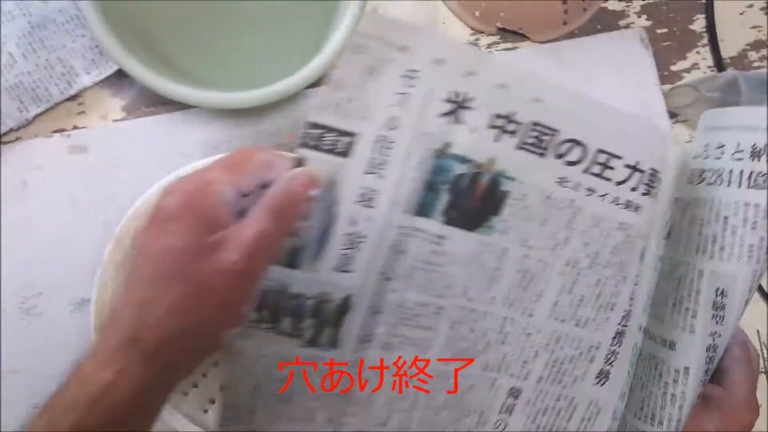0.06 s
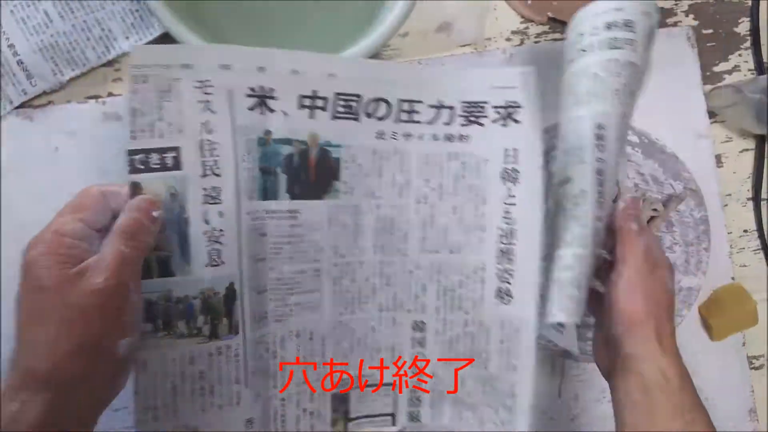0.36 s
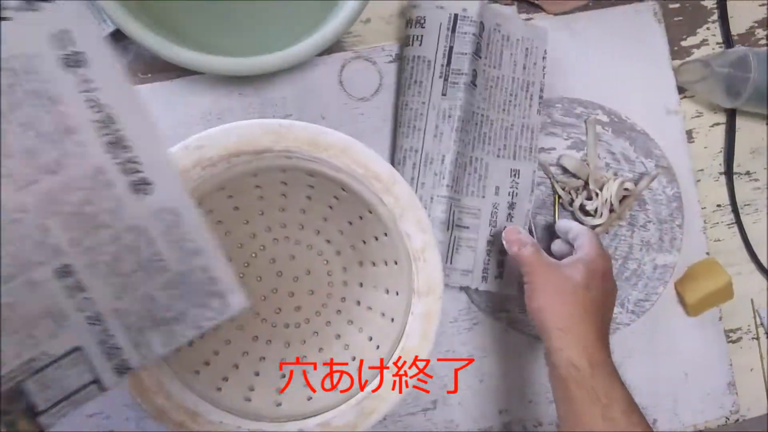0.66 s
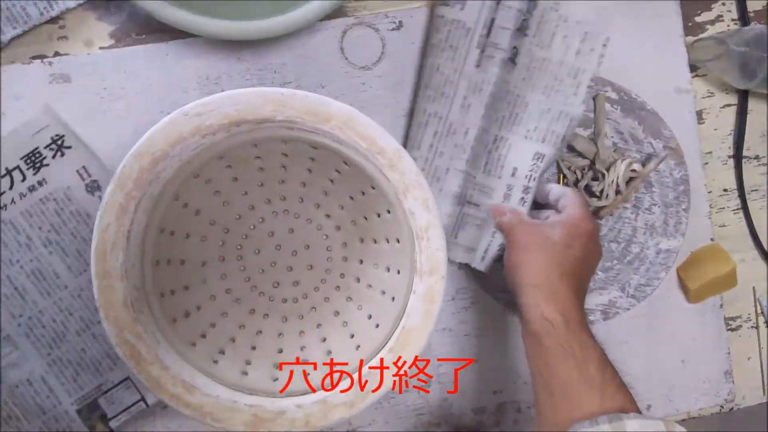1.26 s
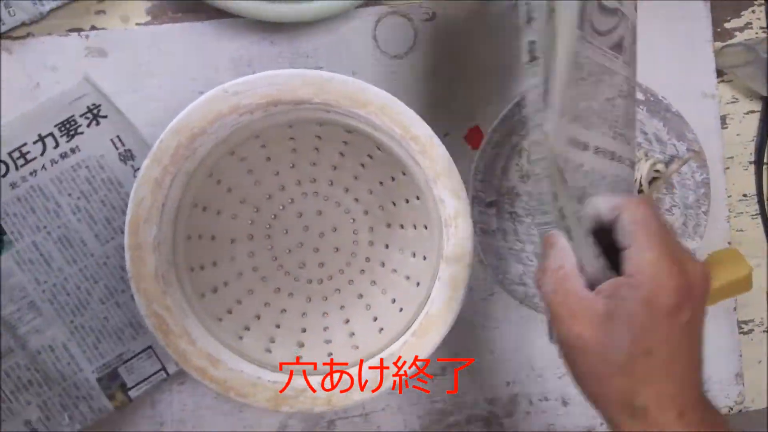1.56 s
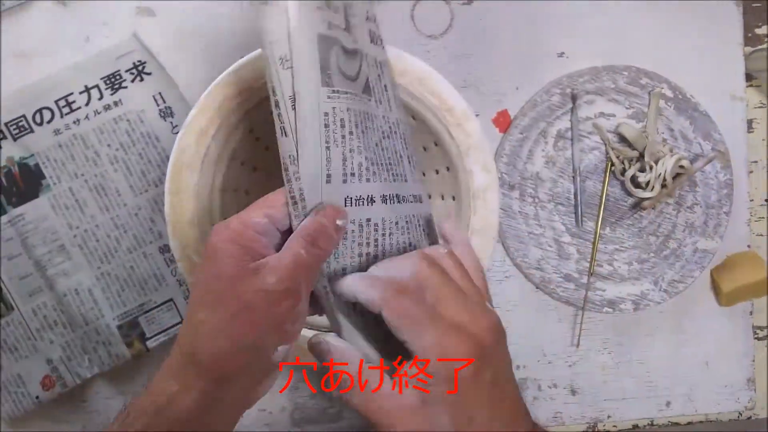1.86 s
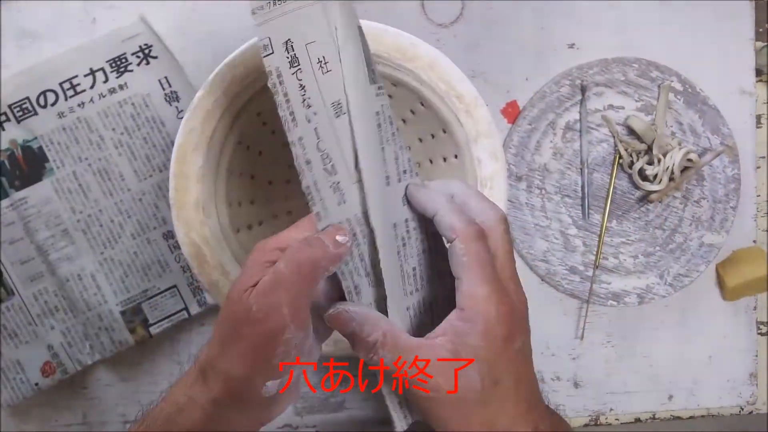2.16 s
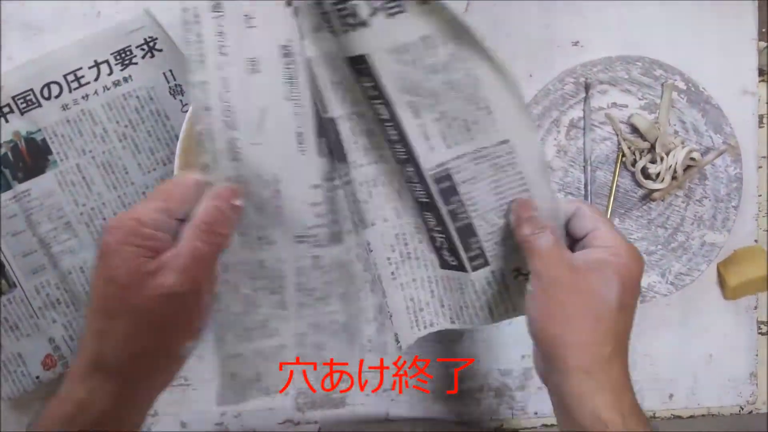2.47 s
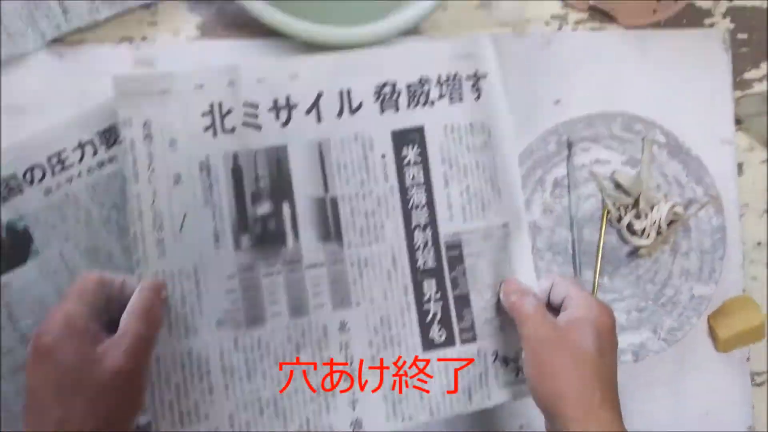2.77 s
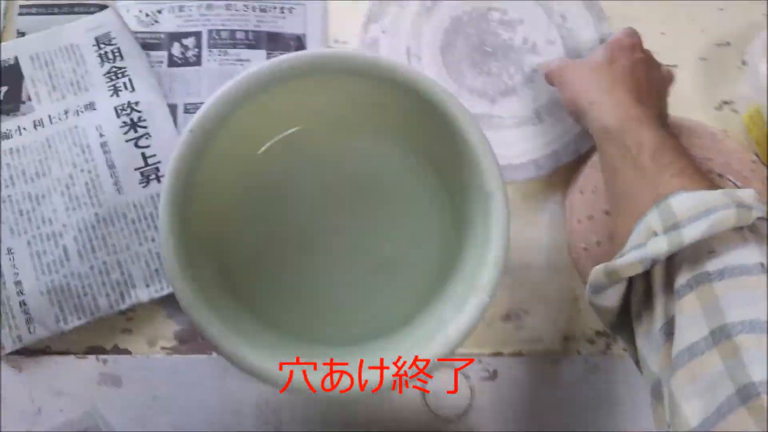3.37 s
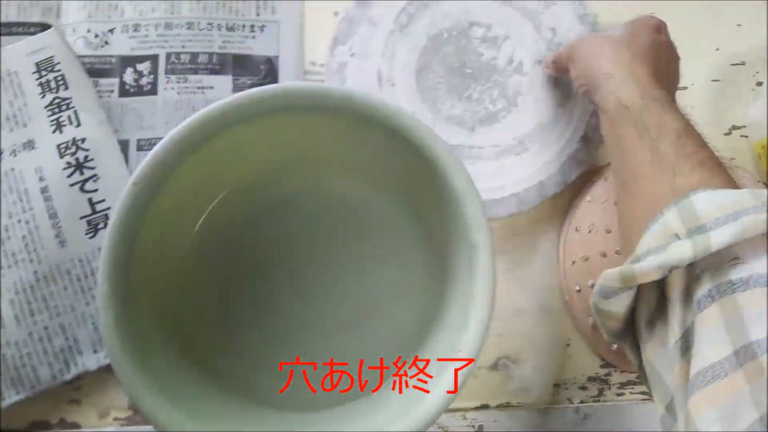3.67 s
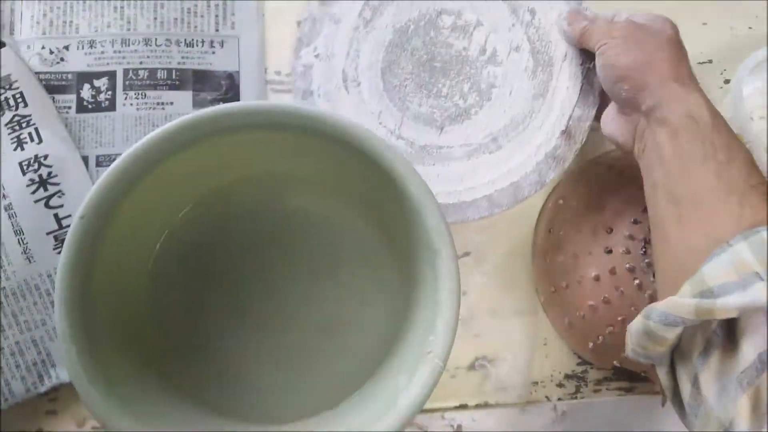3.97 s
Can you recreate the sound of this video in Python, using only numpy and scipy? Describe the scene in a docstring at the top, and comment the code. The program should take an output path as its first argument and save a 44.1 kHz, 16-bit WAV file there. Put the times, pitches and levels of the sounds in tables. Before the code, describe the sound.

Sheets of newspaper being unfolded and laid down, then some soft tabletop knocks and thumps.

```python
"""At a worktable in a small room, sheets of newspaper are pulled apart, unfolded and laid down up close. Paper
slides on paper in a dense fizz of tiny slips, creases buckle with sharp snaps, and loose sheets flap. Near the
end come a few dull pops, soft thumps of the tabletop and two tiny ticks. A faint mains hum and quiet room air
lie underneath."""
import sys
import numpy as np
from scipy import signal
from scipy.fft import rfft, irfft
from scipy.io import wavfile
from scipy.ndimage import map_coordinates

SR = 44100
rng = np.random.default_rng(int(sys.argv[2]) if len(sys.argv) > 2 else 0)


def file_out(sig):
    """Save sig as 16-bit WAV at sys.argv[1]."""
    # one column per channel
    cols = np.atleast_2d(sig).T
    # limit, then scale
    lim = np.clip(cols, -1, 1)
    pcm = np.round(lim * 32767).astype(np.int16)
    wavfile.write(sys.argv[1], SR, pcm)


N = 176400  # 4 seconds

# Each slide of a sheet. It fades by 20 dB in release_s; body and treble are compared with the middle.
# start_s, attack_s, hold_s, release_s, level_db, body_db, treble_db
SLIDES = [ (0.0, 0.0013, 0.05, 0.15, -42.5, -1, 6), (0.141, 0.0042, 0.034, 0.2, -45, 0.5, 4.5),
          (.22, .03, .03, .12, -50, 0, 5.5), (0.296, 0.004, 0.035, 0.22, -43, 1.5, 4),
          (.386, .004, .02, .1, -45, 3, -3), (.46, .02, .02, .1, -52, 6, -3),
          (0.519, 0.034, 0.02, 0.2, -40, 2.5, 1.5), (0.622, 0.044, 0.057, 0.11, -36.5, -6.5, -9.5),
          (0.749, 0.014, 0.021, 0.4, -51, 5, -1), (.955, .003, .008, .09, -51, -1, 4),
          (1.012, 0.004, 0.008, 0.13, -47.5, 0, 3), (1.1, .01, .01, .1, -54, 4, 2),
          (1.117, 0.01, 0.017, .16, -38.5, -2, 3.5), (1.18, 0.0211, 0.087, 0.33, -42, -4.5, 3),
          (1.399, 0.02, .04, 0.1529, -42.5, -2.5, 3.5), (1.467, 0.0043, 0.024, .15, -38.5, -1, 2),
          (1.557, .02, 0.039, 0.1983, -48, 1.5, 6), (1.684, 0.0085, 0.022, 0.16, -42, -5, 2.5),
          (1.8, 0.013, 0.04, .4, -50, -1, 2), (1.901, .009, 0.024, 0.055, -30, -3.5, -2.5),
          (1.94, 0.02, 0.035, 0.18, -36.5, -2, 1.5), (2.044, 0.0069, 0.042, .18, -41.5, 1, 4.5),
          (2.129, .005, 0.011, 0.3, -40.5, -7, 2), (2.258, 0.016, 0.073, 0.3, -39.5, -3.5, -1),
          (2.396, .006, 0.006, 0.08, -33.5, -8, -4.5), (2.428, 0.022, 0.032, 0.2, -38, -4, 0.5),
          (2.538, 0.014, 0.018, 0.13, -36.5, -1.5, -1), (2.624, 0.036, .02, 0.15, -37.5, -3, -1),
          (2.687, .004, 0.018, 0.0728, -33, -1, -3), (2.731, 0.026, 0.024, 0.09, -34, 0, 0.5),
          (2.822, 0.013, 0.022, 0.13, -40, 5, -3.5), (2.888, .004, .015, .09, -45, 6, -3),
          (3.206, 0.053, 0.044, 0.5, -65.5, 7.5, -6), (3.33, .02, .03, .1, -63, 0, 0),
          (3.383, 0.0063, 0.017, 0.135, -42, 9.5, -8), (3.502, 0.015, 0.023, 0.25, -61.5, 5, 9.5),
          (3.6, .01, 0.055, 0.35, -59.5, -10, 4), (3.69, .03, 0.035, 0.02, -55.5, 0, 1),
          (3.821, 0.021, 0.03, 0.2, -53.5, -1, 0), (3.94, .02, .03, .2, -59, -1, 0)]
def sliding(slips_per_s=1400, slip_spread_db=3.1, flutter_per_s=120, flutter_db=0.88, gain_db=-0.8):
    """Paper rubs on paper: tiny uneven slips over a fine fizz. Gives body, middle and treble layers."""
    t, power = np.arange(SR // 2) / SR, np.zeros((3, N))
    for start, attack, hold, release, db, body_db, treble_db in SLIDES:
        fade_db = 20 * np.maximum(t - attack - hold, 0) / release
        envelope = np.minimum(t / attack, 1) * undb(db - fade_db)
        add(power, (undb([[body_db], [0], [treble_db]]) * envelope) ** 2, start)
    sizes = undb(slip_spread_db * np.minimum(rng.exponential(size=N), 4))
    slips = (rng.random(N) < slips_per_s / SR) * sizes * rng.choice([-1, 1], (2, N))
    smear = rng.standard_normal((2, 256)) * np.exp(-t[:256] / 0.00086)  # the sheet blurs each slip
    slips = shape(slips, np.exp(1j * np.angle(rfft(smear, N))))
    fizz = rng.standard_normal((2, N))
    rubbing = unit(unit(slips) + fizz)
    wobble = np.interp(np.arange(N) / SR * flutter_per_s, np.arange(4096), rng.standard_normal(4096))
    return np.sqrt(power)[:, None] * rubbing * undb(gain_db + flutter_db * wobble)


# Each crease that gives way: start_s, level_db, body_db, treble_db, pitch_hz
CREASES = [ (0.144, -39, -1, -5, 3300), (.302, -41, -2, 0, 2300), (.389, -33.5, 0, -20, 2100),
           (0.5138, -37, 2.5, -14.5, 3900), (0.678, -31, -5, -25, 3300), (0.7148, -31, -15, -8, 3800),
           (.9555, -43, -1, 3, 3300), (.962, -44.5, -10, 7, 3500), (1.015, -41, -3, 5.5, 3500),
           (1.218, -39, -5, 0, 2700), (1.2632, -42, -9, -3, 3300), (1.3223, -30.5, -0.5, -3, 3600),
           (1.333, -35.5, 2, 0, 2700), (1.383, -41, -3, -12, 3000), (1.4685, -30, -9, -8, 3200),
           (1.5741, -37.5, -15, -10, 3700), (1.637, -41, 2, -9, 3400), (1.7596, -39.5, -12, -12, 2800),
           (1.8326, -41, -10, -4, 5700), (1.9107, -27.5, -6, -12, 2700), (1.9905, -33, -0.5, 6.5, 4000),
           (2.053, -36, 2, -4, 2400), (2.0653, -30, 2, 7.5, 4600), (2.095, -36, -4, 5, 3400),
           (2.1322, -30, -7, 7.5, 4300), (2.1364, -30, -2.5, 8.5, 4400), (2.236, -37, -1.5, 3.5, 4800),
           (2.262, -39, -4, 4, 3600), (2.2888, -31.5, -5.5, 5, 3600), (2.311, -31.5, -3, -1, 3800),
           (2.3395, -34, -2.5, -3, 3700), (2.388, -31, -20, -4, 3400), (2.4025, -28.5, -12, -4, 3500),
           (2.479, -37, -11, 8, 3700), (2.553, -36, 0, -3, 4800), (2.6683, -34, -6, -10, 3300),
           (2.6903, -27.5, -7, -5, 3600), (2.7425, -28.5, -11, -5, 3400), (2.7628, -31, -3, 4.5, 3600),
           (2.802, -33, 1.5, -7, 3700), (2.8882, -38, 0, 0, 1300)]
def buckling(snap_s=0.0013, shiver_s=0.0072, shiver_db=-2.5, ring_db=3.5, width_hz=1100, gain_db=-2.5):
    """A crease snaps at its own pitch and the sheet shivers. Gives body, middle and treble layers."""
    t, out = np.arange(2048) / SR, np.zeros((3, 2, N))
    envelope = np.exp(-t / snap_s) + undb(shiver_db) * np.exp(-t / shiver_s)
    for start, db, body_db, treble_db, hz in CREASES:
        snap = rng.standard_normal((2, len(t))) * envelope
        snap /= np.sqrt(np.sum(snap ** 2, axis=1, keepdims=True) / (SR // 200))  # even out the energy
        ring = signal.lfilter(*signal.iirpeak(hz, hz / width_hz, fs=SR), snap)
        snap += (undb(ring_db) - 1) * ring
        layer_gains = undb(db + gain_db + np.array([body_db, 0, treble_db]))
        add(out, layer_gains[:, None, None] * snap, start)
    return out * pan(-1)


# Each ringing sheet or pocket of air: centre_s, half_length_s, pitch_hz, width_hz, level_db
SHEET_FLAPS = [(0.164, .03, 1110, 300, -52), (0.318, 0.022, 1720, 200, -53), (.375, .04, 1050, 500, -52),
               (.345, 0.04, 190, 200, -55), (.515, .007, 830, 200, -46), (0.588, 0.028, 580, 130, -46.5),
               (0.579, 0.053, 990, 300, -52.5), (0.676, 0.022, 3100, 800, -43),
               (1.024, 0.012, 536, 110, -52), (1.134, 0.018, 165, 120, -50),
               (1.925, 0.019, 1400, 900, -35.5), (2.785, 0.07, 530, 110, -45), (2.838, 0.012, 350, 80, -43),
               (2.902, 0.04, 560, 200, -53.5), (2.703, .025, 3500, 1000, -36),
               (3.419, 0.037, 220, 250, -51), (3.5, .05, 400, 500, -55), (3.77, 0.043, 600, 700, -59),
               (3.871, 0.052, 960, 300, -61.5)]
def flapping():
    """Loose sheets flap and the hollows between them ring for a moment."""
    t, out = np.arange(-6000, 6000) / SR, np.zeros((2, N))
    for centre, half_length, hz, width, db in SHEET_FLAPS:
        swell = undb(db) * np.exp(-(t / half_length) ** 2)
        add(out, swell * ringing(hz, width, len(t)), centre + t[0])
    return out


def bending(sound, depth_db=1.83, width_hz=328.4, hold_s=0.05):
    """As the sheet bends, random pitches in its sound grow stronger and weaker."""
    hz, t, spectrum = signal.stft(sound, SR, nperseg=512)
    random_grid = rng.standard_normal((256, 512))
    positions = np.meshgrid(hz / width_hz, t / hold_s, indexing="ij")
    swell = map_coordinates(random_grid, positions, order=1, mode="mirror")
    return signal.istft(spectrum * unit(undb(depth_db * unit(swell))), SR)[1][:, :N]


# The tone of the paper, from low to high: pitch_hz, level_db
PAPER_TONE = [(40, -33), (120, -14.5), (230, -7.5), (350, -4.5), (550, -2.3), (800, -1), (1400, -3),
              (2200, -1.5), (3300, 1.5), (4300, -1), (5800, -3), (7200, -7), (8400, -5), (9400, -10.5),
              (10400, -12), (11300, -22.5), (12200, -31), (15000, -37)]
def newspaper(body_below_hz=1230, treble_above_hz=6500, room_db=-5.5):
    """Slips, snaps and flaps spread from the sheet, fill the room and reach two microphones."""
    body, middle, treble = rfft(sliding() + buckling())
    low = 1 / (1 + (frequencies() / body_below_hz) ** 4)
    high = 1 - 1 / (1 + (frequencies() / treble_above_hz) ** 4)
    spectrum = body * low + middle * (1 - low - high) + treble * high
    rustle = irfft(unit(gains(PAPER_TONE)) * spectrum)
    sheet = bending(rustle) + flapping()
    return microphone_tone(narrow_bass(sheet + undb(room_db) * room(sheet)))


# Short dull pops, each leaning to one side: centre_s, pitch_hz, half_length_s, level_db, left_minus_right_db
DULL_POPS = [(2.9771, 1400, 0.00062, -35, 15), (2.9795, 1100, .0015, -45, 12),
             (3.003, 370, 0.0015, -38.3, -21), (3.0727, 307, 0.002, -48, -21),
             (3.0805, 940, 0.0011, -47, 3), (3.1409, 305, 0.0019, -48.3, -19),
             (3.619, 520, 0.0009, -35, 17), (3.621, 1050, .0011, -42, 12)]
def pops(ring_db=-13, ring_cycles=2.2):
    """Each pop dies almost at once: a strong cycle or two, then a faint short ring."""
    t, out = np.arange(-512, 1536) / SR, np.zeros((2, N))
    for centre, hz, half_length, db, pan_db in DULL_POPS:
        ring = (t > 0) * undb(ring_db) * np.exp(-np.abs(t) * hz / ring_cycles)
        envelope = np.maximum(np.exp(-(t / half_length) ** 2), ring)
        add(out, pan(pan_db) * undb(db) * envelope * np.sin(2 * np.pi * hz * t), centre + t[0])
    return out


# The notes the tabletop rings with, each fading by 60 dB in fade_s: pitch_hz, level_db, fade_s
TABLE_NOTES = [(69, -5.5, 0.21), (131, -2.5, 0.155), (193, -6, .11), (281, -9.5, 0.12), (451, -8, 0.12),
               (676, -6, 0.041), (870, 5, 0.038), (960, 3, 0.04)]
# Blows on the tabletop: start_s, level_db, contact_s
TABLE_BLOWS = [(3.473, -44, .006), (3.487, -43, 0.006), (3.502, -49, .006), (3.518, -53, .006),
               (3.7376, -39.5, 0.0009), (3.748, -43, 0.003), (3.755, -42, .004), (3.7695, -44, .005),
               (3.816, -49, 0.0066)]
def tabletop():
    """Each blow sets the table ringing; a soft, long contact wakes only its low notes."""
    t, out = np.arange(SR // 2) / SR, np.zeros(N)
    ring = sum(undb(db - 60 * t / fade) * np.sin(2 * np.pi * hz * t) for hz, db, fade in TABLE_NOTES)
    for start, db, contact in TABLE_BLOWS:
        push = np.sin(np.pi * t[t < contact] / contact) ** 2
        add(out, undb(db) * signal.fftconvolve(ring, push / push.sum()), start)
    return out * pan(-3)


# Each light touch: start_s, level_db
TINY_TICKS = [(3.5999, -33), (3.6142, -41)]
def ticks(decay_s=0.0004, top_hz=9000):
    """Tiny contacts give off very short bursts of bright noise."""
    t, out = np.arange(1024) / SR, np.zeros((2, N))
    for start, db in TINY_TICKS:
        add(out, undb(db) * np.exp(-t / decay_s) * ringing(hz=5000, width_hz=5000, size=len(t)), start)
    return signal.sosfilt(signal.butter(3, top_hz, fs=SR, output="sos"), out)


def room(sound, fade_s=0.22, build_up_s=0.0036):
    """Sound bounces off the table and near walls in a blur of echoes that quickly dies."""
    t = np.arange(SR // 3) / SR
    envelope = undb(-60 * t / fade_s) * np.minimum(t / build_up_s, 1) ** 2
    echoes = rng.standard_normal((2, len(t))) * envelope
    echoes /= np.sqrt(np.sum(echoes ** 2, axis=1, keepdims=True))
    return signal.fftconvolve(sound, echoes, axes=1)[:, :N]


# The tone of the room air: pitch_hz, level_db
AIR_TONE = [(20, -15), (40, -5), (62, 4.5), (85, -1.5), (150, -7.5), (330, -8), (600, -14), (1200, -19.5),
            (3000, -21), (6000, -21.5), (9500, -28), (12000, -39), (15000, -44.5)]
def air_and_hum(air_db=-60.5, hum_hz=59.3, hum_db=-68.5):
    """Quiet room air with a low mains hum."""
    air = unit(narrow_bass(shape(rng.standard_normal((2, N)), gains(AIR_TONE))))
    hum = unit(np.sin(2 * np.pi * hum_hz * np.arange(N) / SR))
    return (undb(air_db) * air + undb(hum_db) * hum) * pan(-1.5)


# How wide the sound is (mid is what left and right share, side is the rest): pitch_hz, side_minus_mid_db
STEREO_WIDTH = [(60, -7.5), (250, -7.5), (550, -10.5), (1000, -4), (2000, -0.5), (4000, 0), (15000, 0.5)]
def narrow_bass(sound):
    """Two microphones close together hear the bass alike and the treble apart."""
    left, right = sound
    width = gains(STEREO_WIDTH)
    keep_level = np.sqrt(2 / (1 + width ** 2))
    mid = shape((left + right) / 2, keep_level)
    side = shape((left - right) / 2, keep_level * width)
    return np.array([mid + side, mid - side])


# Which microphone hears each pitch louder: pitch_hz, left_minus_right_db
MIC_BALANCE = [(100, -1.5), (850, -2.3), (1200, 0), (1650, -3.2), (2100, -1.7), (2700, -3.5), (3400, -8),
               (4000, -1.5), (4800, 3), (6000, 0), (7100, -0.5), (8300, -8.5), (9300, -.5), (10400, 5.5),
               (11500, 3), (13000, -1.5)]
def microphone_tone(sound):
    """Each microphone colours the sound in its own way."""
    ratio = gains(MIC_BALANCE)
    right_gain = np.sqrt(2 / (1 + ratio ** 2))
    return shape(sound, np.array([ratio * right_gain, right_gain]))


def ringing(hz, width_hz, size):
    """Stereo noise gathered around one pitch."""
    f = frequencies(size) + 1
    gain = 1 / (1 + (0.64 * (f - hz ** 2 / f) / width_hz) ** 2)
    return unit(shape(rng.standard_normal((2, size)), gain))


def undb(db):
    """Turn decibels into a gain, a number to multiply by."""
    return np.exp(np.asarray(db) * (np.log(10) / 20))


def unit(x):
    """Scale to an average (rms) level of 1."""
    return x / np.sqrt(np.mean(x ** 2))


def pan(db):
    """Left and right gains; positive db leans left."""
    return undb(np.array([[db], [-db]]) / 2)


def frequencies(size=N):
    """The frequency in Hz of each point in a spectrum."""
    return np.arange(size // 2 + 1) * SR / size


def gains(points):
    """Join (pitch_hz, level_db) points into a gain for every frequency."""
    hz, db = np.array(points, float).T
    return undb(np.interp(np.log(frequencies() + 1), np.log(hz), db))


def shape(sound, gain):
    """Multiply each frequency of a sound by its own gain."""
    return irfft(rfft(sound) * gain)


def add(out, sound, start_s):
    """Mix a short sound in from a given time."""
    i = max(int(start_s * SR), 0)
    out[..., i:i + sound.shape[-1]] += sound[..., :N - i]


def scene(blows_room_db=-13.5):
    """The newspaper, then pops, thumps and ticks with their echoes, over air and hum."""
    blows = pops() + tabletop() + ticks()
    return newspaper() + blows + undb(blows_room_db) * room(blows) + air_and_hum()


def record(dry):
    """Thin the deepest bass (below 37 Hz) and cut the highest treble (above 15100 Hz)."""
    thinned = signal.sosfilt(signal.butter(2, 37, "highpass", fs=SR, output="sos"), dry)
    return signal.sosfilt(signal.ellip(8, 0.2, 70, 15100, fs=SR, output="sos"), thinned)


dry = scene()
out = record(dry)
file_out(out)
```